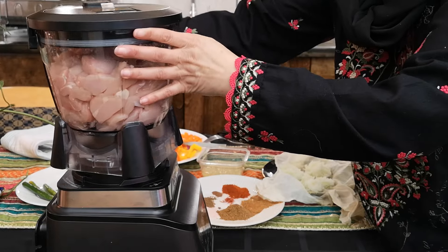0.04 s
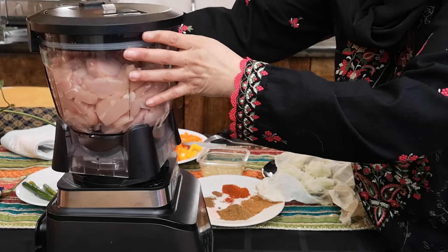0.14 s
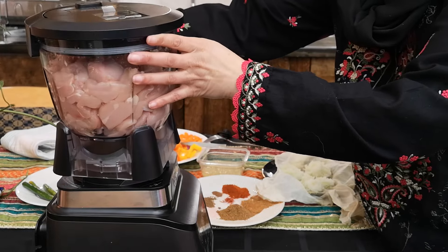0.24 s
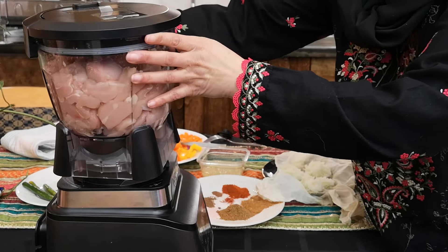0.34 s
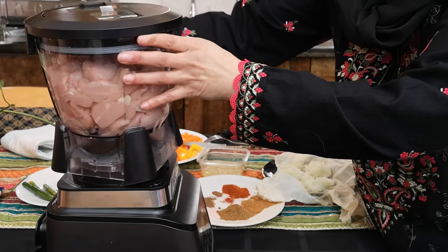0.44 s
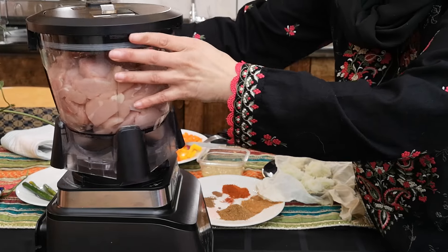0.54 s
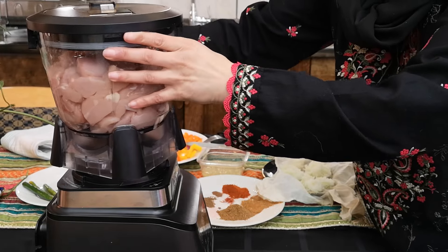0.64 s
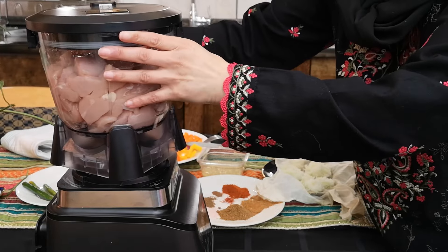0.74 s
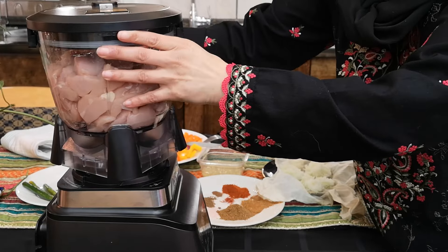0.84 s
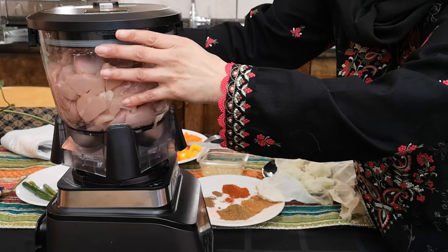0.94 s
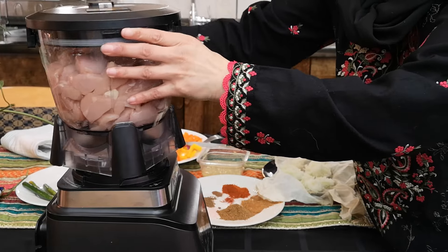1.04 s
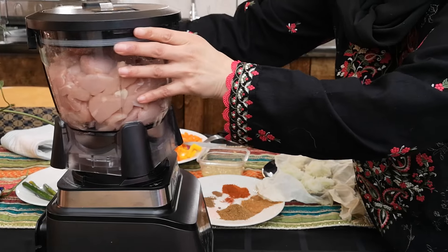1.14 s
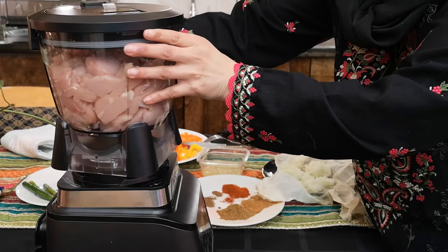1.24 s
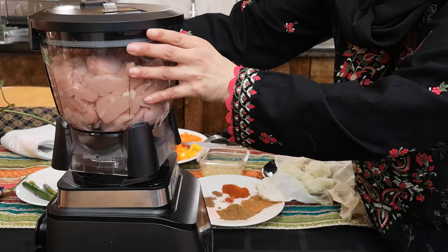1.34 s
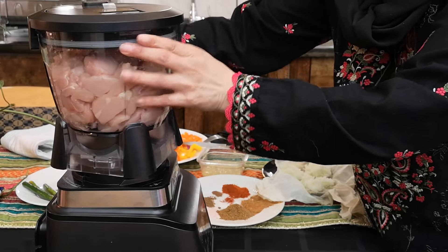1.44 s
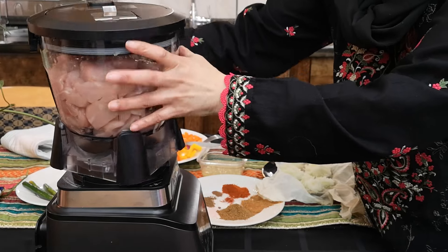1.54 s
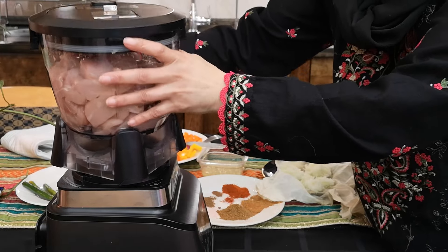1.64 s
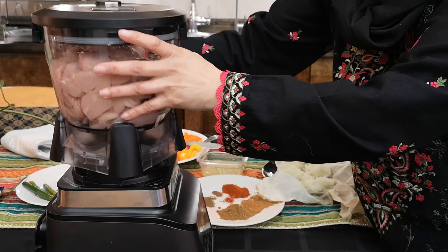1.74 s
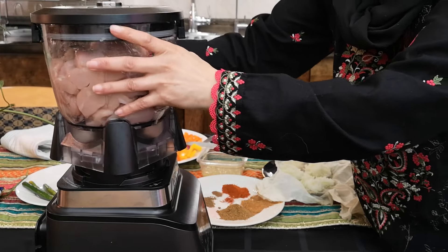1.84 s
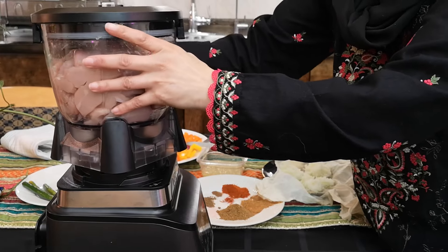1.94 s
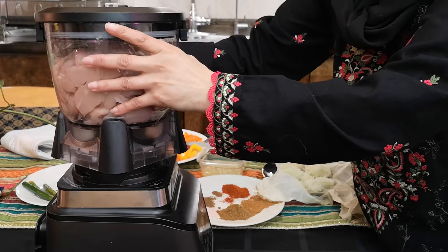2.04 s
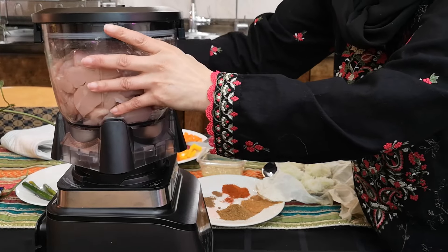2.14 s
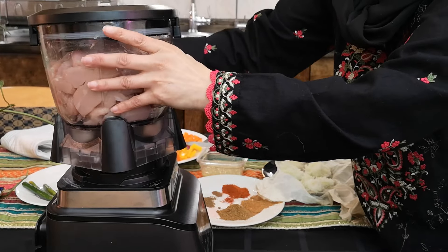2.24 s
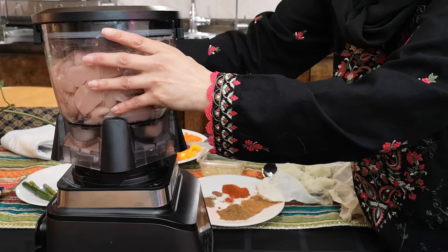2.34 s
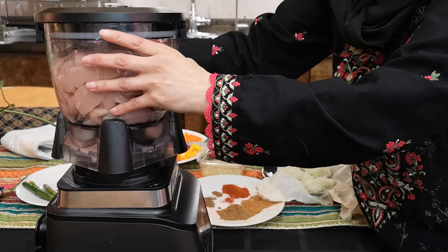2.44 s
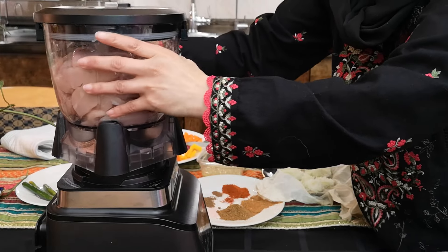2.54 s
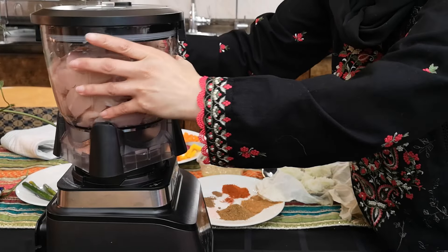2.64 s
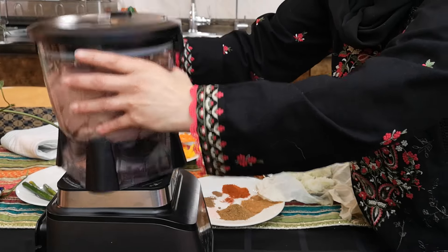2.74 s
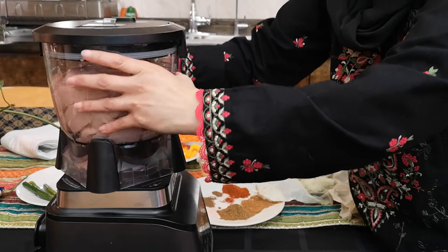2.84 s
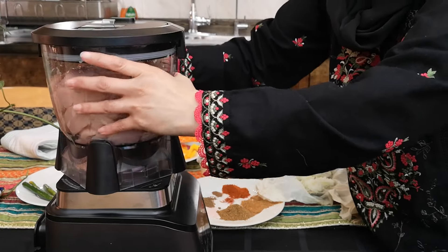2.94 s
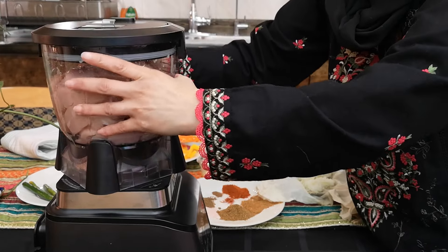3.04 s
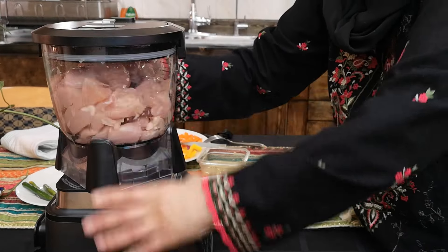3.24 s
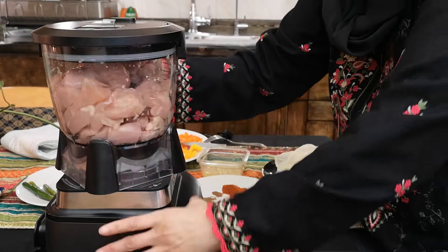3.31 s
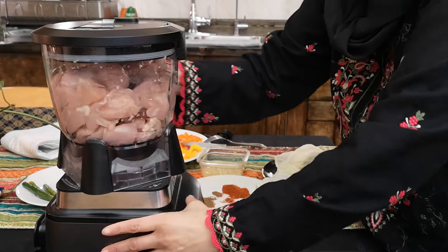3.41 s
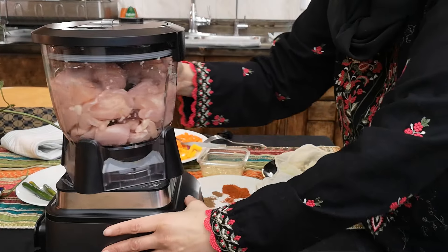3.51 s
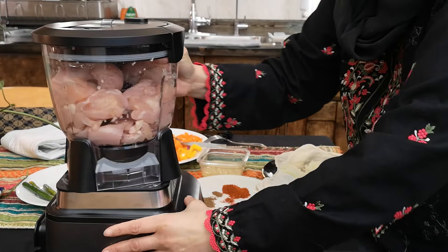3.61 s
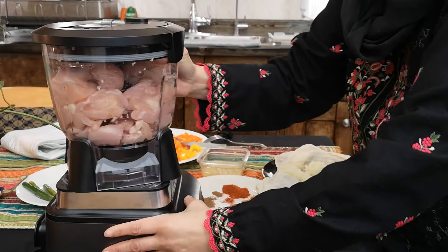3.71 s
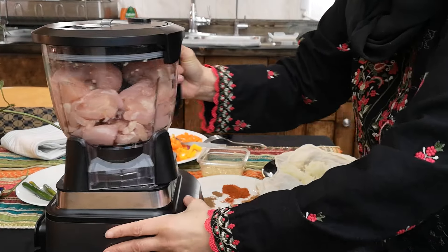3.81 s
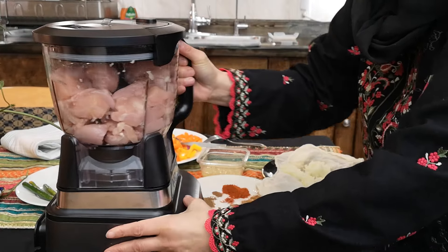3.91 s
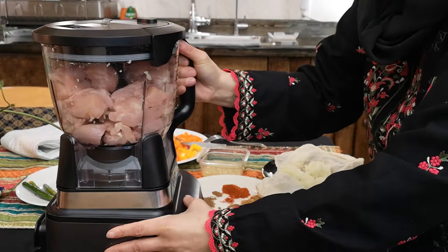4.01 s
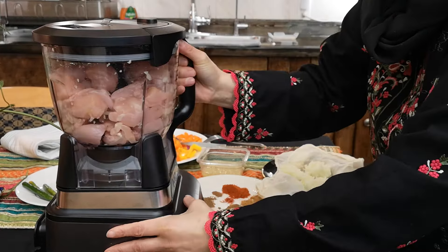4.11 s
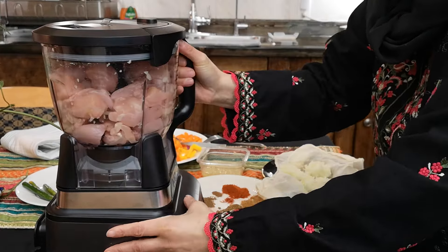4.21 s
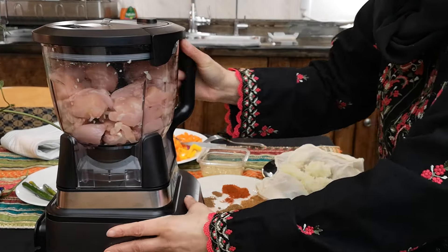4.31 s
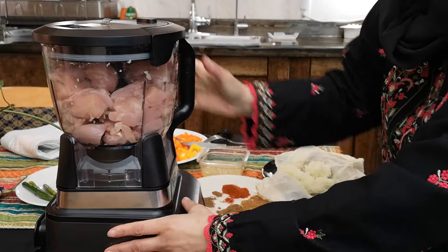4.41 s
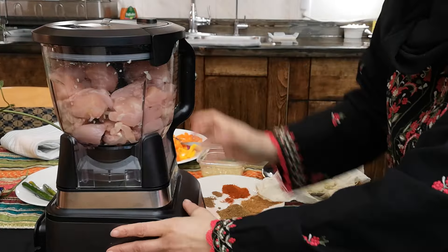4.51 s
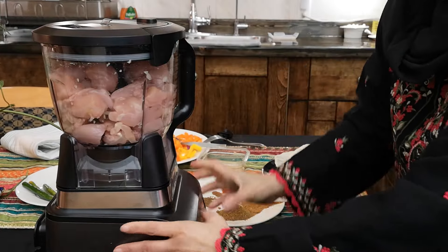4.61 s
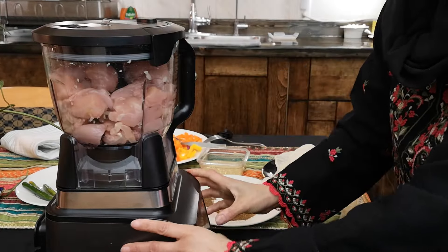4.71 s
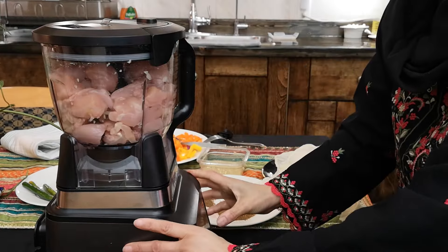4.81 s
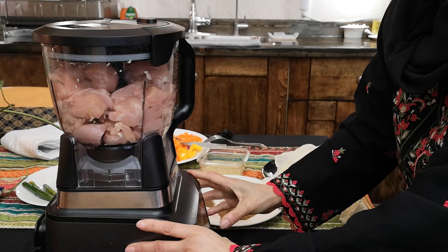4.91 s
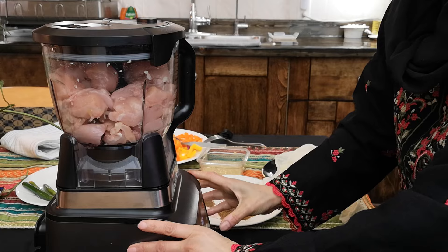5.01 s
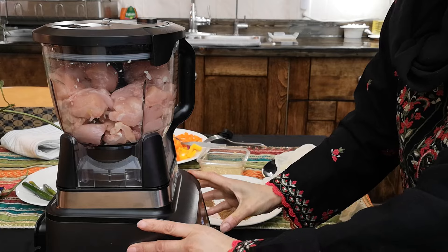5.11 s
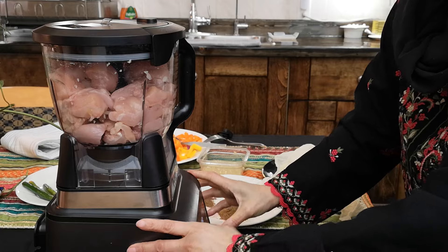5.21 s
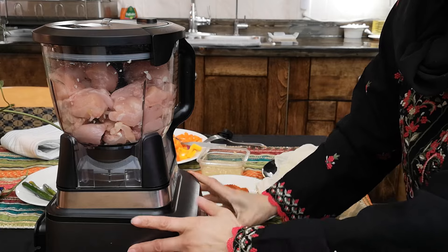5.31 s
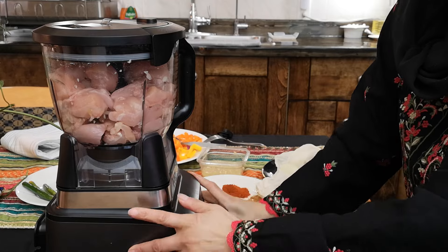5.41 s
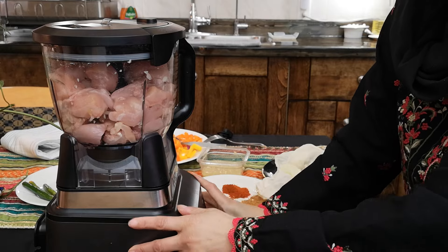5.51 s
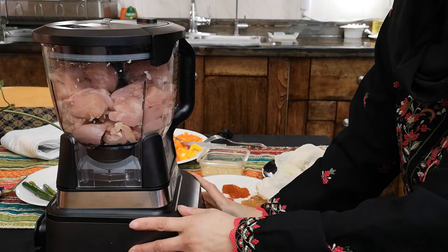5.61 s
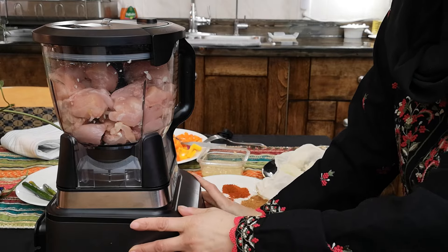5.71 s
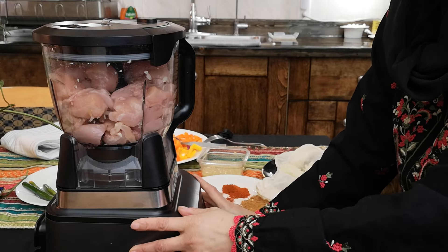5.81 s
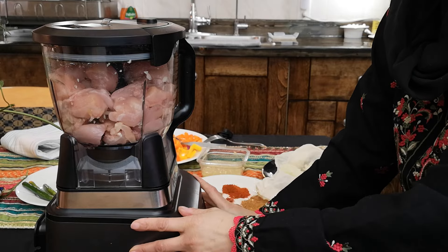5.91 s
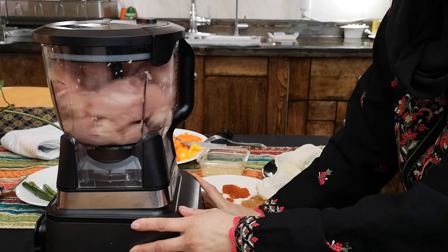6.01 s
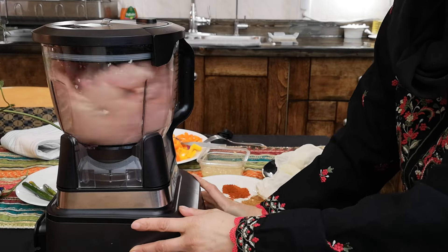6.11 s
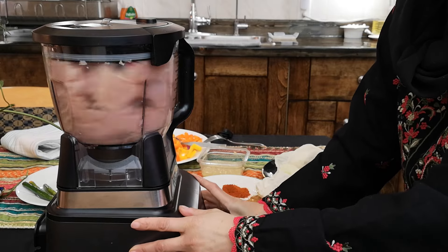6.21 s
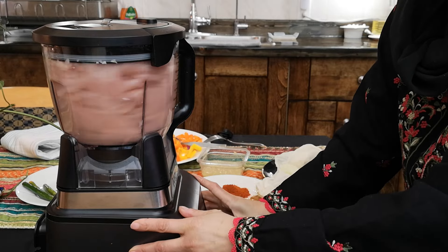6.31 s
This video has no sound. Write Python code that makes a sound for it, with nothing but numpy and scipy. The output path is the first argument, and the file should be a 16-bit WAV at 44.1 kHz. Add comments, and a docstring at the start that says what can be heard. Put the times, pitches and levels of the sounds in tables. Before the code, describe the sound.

A close stereo kitchen scene with short, hard reflections, low rumble, soft hiss and a wavering low hum that swells until about 1.4 s and again from 2.3 to 3.6 s. A plastic bowl is nudged on its base: faint dull rubs at 0.2, 0.5, 0.7 and 1.1 s, then shorter, slightly stronger scuffs from 1.6 to 1.9 s. At 2.8-3.1 s it seats with a rapid clatter, the loudest clunk at 2.9 s, hollow thump and deep rocking of the base. A tiny rub follows at 3.5 s. Around 4.0-4.1 s the lid latch snaps in several bright clicks; a faint tick comes at 4.4 s. Small button clicks sound near 5.0, 5.3 and 5.9 s. At 6.04 s the motor starts, quickly loud, with rising whine, gear rattle, fan rush and meat thudding against the bowl, still running at the end.

```python
"""Food processor on a kitchen table

The plastic bowl is nudged round, a stick-slip scuff over a hollow drone, then drops onto the base and rocks it.
The lid latch snaps shut and buttons click: short bursts of dense plastic modes, pings and a body thump.
The motor spins up with gear rattle, fan rush and whine, throwing food against the bowl.
A hard room answers every blow; a wavering low hum, a rumble and a soft hiss lie underneath."""
import sys
import numpy as np
from scipy import signal
from scipy.fft import rfft, irfft
from scipy.io import wavfile
from scipy.ndimage import uniform_filter1d

SR = 44100
rng = np.random.default_rng(int(sys.argv[2]) if len(sys.argv) > 2 else 0)


def waveform_to_disk(signal):
    """Save audio, clipped to [-1, 1], as 16-bit WAV at the path in sys.argv[1]."""
    frames = np.transpose(np.atleast_2d(signal))
    scaled = np.clip(frames, -1, 1) * 32767
    samples = np.round(scaled).astype(np.int16)
    wavfile.write(sys.argv[1], SR, samples)


N = 280035
TIME = np.arange(N) / SR

# Colour of the motor housing: (frequency [Hz], relative density [dB per Hz])
HOUSING_COLOUR = [(300, -27), (500, -13.5), (700, -2.5), (880, -7.5), (1400, -2.5), (1850, -2), (2300, 3.5),
                  (3100, -9), (5000, -16.5), (5800, -16), (6500, -19), (7800, -16), (11500, -38),
                  (15500, -68)]
# Uneven radiation of the housing: (frequency [Hz], left-right difference [dB])
HOUSING_LEAN = [(60, 0.0), (110, 0.0), (200, 0.0), (380, -9), (700, 4.5), (1290, -0.5), (2380, -2.0),
                (4400, 3.5), (8120, 3.5), (15000, -12)]
# Colour of food churning in the bowl: (frequency [Hz], relative density [dB per Hz])
CHURN_COLOUR = [(85, -15.5), (120, -3), (190, -6), (305, 0.5), (355, -2), (450, -25.5), (900, -63)]
# Gear and commutator whine: (multiple of shaft speed [ratio], level [dB])
WHINE_TONES = [(9, -8.5), (12, -6.5), (18, -32), (31, -39), (40, -29)]
# Blades biting into big pieces: (time [s], extra drive [dB], extra churning [dB])
FOOD_BITES = [(6.111, 7, 10), (6.188, 7, 7), (6.278, 3, 4.5)]
# Plastic contacts: (time [s], level [dB], ring t60 [s], body thump [dB], left-right difference [dB],
# rebound against the first blow [dB], part [name])
PART_CONTACTS = [ (2.812, -41.5, 0.056, -56, 6, 1.5, "rim"), (2.848, -24, 0.054, -37, 4, -3.5, "rim"),
                 (2.867, -20, 0.19, -22, 3.5, -10, "rim"), (2.891, -9, 0.015, -17.5, -1.5, -8, "seat"),
                 (2.891, -22.5, 0.019, -42, 6, -24, "latch"), (2.946, -18, 0.1, -24.5, -5.5, -9.5, "seat"),
                 (2.996, -24, 0.26, -40, -1.5, -14.5, "seat"), (3.061, -35, 0.058, -47, 1, 3, "catch"),
                 (3.968, -29, .15, -38, -6.5, 2, "lid"), (4.016, -21.5, 0.065, -29, 1.5, -7, "lug"),
                 (4.053, -18.5, 0.011, -31, 7.5, -8.5, "latch"),
                 (4.064, -21, 0.063, -32, -13.5, -8.5, "latch"),
                 (4.096, -21, 0.23, -32, -2.5, -5.5, "latch"), (4.429, -41, 0.2, -66, 5.5, -2, "tab"),
                 (5.027, -35.5, 0.026, -52, 6.5, 1.5, "switch"), (5.243, -57, .08, -57, 4, -10, "tab"),
                 (5.304, -38.5, 0.025, -74, 2, 0, "release"), (5.897, -35, 0.054, -36, 8.5, 2.5, "start"),
                 (6.044, -36, .2, -68, 3, -3, "relay")]
# Colour of each struck part, by name: (frequency [Hz], relative density [dB per Hz])
PART_COLOURS = { "rim": [(88, -45), (150, -16), (290, 0), (352, -18), (462, -16), (668, -11), (1130, -17.5),
                (1480, -17.5), (2310, -18.5), (3220, -32), (3690, -28), (4750, -34), (9360, -36),
                (13000, -50), (15500, -104)], "seat": [(60, -2), (120, -5), (200, 1.5), (310, -0.5),
                (480, -15.5), (720, -17.5), (1000, -15.5), (1350, -15), (1800, -15.5), (2350, -16),
                (3600, -25.5), (6500, -32.5), (10000, -36.5), (15500, -66)], "catch": [(200, 8.5),
                (1800, -10), (2400, 2), (2900, -13), (3500, -2), (3850, -5), (4280, 1), (5000, -15),
                (6700, -18), (7700, -3), (8900, -18.5), (11000, -15), (12300, -18), (13500, -32)],
                "lid": [(150, -11), (300, -3), (520, -8), (750, -6), (900, -3), (1020, -8), (1250, -12),
                (1500, 1.5), (1800, -15), (2400, -4.5), (4200, -22.5), (6400, -22), (7500, -13),
                (15000, -44)], "latch": [(150, -4), (310, 1.5), (560, -12.5), (1100, -1), (1900, -2),
                (2800, 4), (3900, -13.5), (4700, -0.5), (5400, 3.5), (6500, -6.5), (7400, -3.5),
                (10200, -5), (11500, -19.5), (15500, -24)], "lug": [(88, -34), (150, -2), (296, -2),
                (453, -15), (751, -9), (1130, -10), (1480, -12), (1760, -14.5), (2410, -4.5), (4220, -30),
                (5230, -21), (6110, -27), (7130, -29), (10100, -26), (15500, -64)], "tab": [(200, -5),
                (480, -15), (720, 0), (1200, -2), (2200, -0.5), (3500, -10.5), (5200, -6), (7300, -2.5),
                (9500, -17), (12000, -31), (15000, -34)], "switch": [(180, -35), (300, -5), (474, -26),
                (680, -37), (775, -20), (1110, -15), (1330, -26), (1880, -4.5), (2140, -16), (3330, -11),
                (3920, -11.5), (4250, -26), (6510, -25), (7300, -23.5), (15000, -52)],
                "release": [(290, -63), (500, -24), (811, -30), (1130, -22), (1470, -20), (1850, -3),
                (2680, -26), (3050, -34), (3940, -24.5), (5950, -39), (7580, -27), (8490, -42), (9930, -33),
                (11800, -38), (15000, -55)], "start": [(120, -73), (200, -37), (267, -23), (309, 6),
                (397, -10), (581, -24), (1110, -26), (1460, -19.5), (2060, -19.5), (3010, -20), (3940, -33),
                (5760, -25), (6530, -39), (7420, -26), (15000, -60)], "relay": [(400, -17), (2000, 3),
                (3500, -7), (5800, 1), (7000, 4), (8800, -11), (10500, 4), (12500, -18), (15500, -17)]}
# Pings of the springy parts, by name: (frequency [Hz], level against the contact [dB], t60 [s])
PART_PINGS = { "catch": [(2396, -11, .12), (3470, -20, .25), (4220, -14, .2), (7450, -7, .1),
              (7880, -6.5, 0.079)], "lid": [(2670, -8, 0.055)], "lug": [(764, -1, 0.079),
              (2590, -9, 0.047)], "switch": [(1875, -0.5, 0.045)], "release": [(1860, 1, 0.065)]}
# Modes of the hollow bowl and base: (nominal frequency [Hz], nominal level [dB], t60 [s])
BODY_MODES = [(121.9, -11.5, 0.51), (193.6, -4.5, 0.33), (273, -4.5, 0.095), (300.5, 4.5, 0.12),
              (341.8, -8.5, 0.33)]
# Strokes of the bowl's foot rubbing round on the base: (time [s], length [s], level [dB])
RUB_STROKES = [(.221, .2, -52), (0.531, 0.12, -55), (0.712, 0.05, -47), (1.069, 0.23, -53.5),
               (1.571, 0.057, -41.5), (1.646, 0.057, -43.5), (1.766, 0.041, -45.5), (1.852, 0.042, -45),
               (3.48, 0.061, -46.5)]
# Colour of the scuff: (frequency [Hz], relative density [dB per Hz])
SCUFF_COLOUR = [(150, -10), (300, 10), (450, -8.5), (660, -1), (950, -10), (1300, -4.5), (2500, -18.5),
                (7500, -32.5), (15000, -42)]
# Shoves that set the base rocking on its feet: (time [s], length [s], level [dB])
BASE_SHOVES = [(2.9063, 0.21, -17.5), (4.117, 0.044, -24.5)]
# Room decay: (frequency [Hz], t60 [s])
KITCHEN_DECAY = [(100, 0.56), (300, 0.19), (1000, 0.27), (2800, 0.25), (7000, 0.22), (14000, 0.14)]
# Swells of the low hum: (time [s], length [s], level added to the resting hum [dB])
LOW_HUM_SWELLS = [(-.1, 1.49, -49), (2.295, 1.36, -48.5)]
# Colour of the soft hiss: (frequency [Hz], relative density [dB per Hz])
AIR_COLOUR = [(240, -30.5), (400, -4.5), (452, -2), (503, -8), (663, -8.5), (860, -8), (1170, -3.5),
              (1260, -7), (1740, 0), (2510, -7), (3300, -15.5), (6480, -20.5), (7670, -20), (8530, -24),
              (15500, -30.5)]
# Colour of the rumble: (frequency [Hz], relative density [dB per Hz])
RUMBLE_COLOUR = [(12, -29), (20, 4.5), (33, 1.5), (54, -11), (97, -2), (136, -16), (165, -7.5),
                 (241, -19.5), (278, -14), (450, -33), (580, -51), (990, -120)]

# the motor closes in on its top speed; its noise grows steeply until the gears run at full load
MOTOR_ON_S, SPIN_UP_S, TOP_TURNS_PER_S = 6.04, 0.137, 195   # SPIN_UP_S is a time constant
LOADED_TURNS_PER_S, LOAD_POWER = 52.5, 4.6
DRIVE_DB, CHURN_DB = -19, -21.5
CHURN_FALL_DB_PER_S = -18   # the churning eases as the food is flung outward
BITE_S, SLAP_LAG_S = 0.013, 0.014   # half length of a bite; the piece hits the bowl a moment later

# every part rebounds once against its opposite edge
REBOUND_S, REBOUND_THUMP_DB = 0.0128, -3.5   # delay; thump change
REBOUND_RING, REBOUND_PAN = 1.1, -0.9   # ratios to the first blow
BODY_RISE_S = 0.0046

SCUFF_DB, SCUFF_DB_PER_S = -4, -28   # scuff against the bowl's drone: long slow strokes scuff less
ROCK_HZ, ROCK_ATTACK_S, ROCK_T60_S = 22.5, 0.04, 0.24
HUM_HZ, HUM_REST_DB, HUM_FADE_S = 86.7, -63, 0.17   # HUM_HZ is the centre of the waver
AIR_DB, RUMBLE_DB = -52, -45
CUTOFF_HZ = 15600


def motor(teeth=6, rattle_db=0.0, fan_db=-4.0, whine_db=0.0, uneven_db=4.0,
          jitter=0.025, treble_hz=3000, dull=0.97, chop_db=1.5):
    """Gear teeth rattle the housing, the fan rushes and brightens with speed, the blades chop and churn the food."""
    running = TIME > MOTOR_ON_S
    speed, drive, food = spin_up(TIME[running])
    length = len(speed)
    load = rms_one(butter(rng.standard_normal(length), 70, "low"))   # changes as blades meet food
    turns = np.cumsum(speed * (1 - jitter * load)) / SR

    # one knock for each passing tooth, each of its own strength and sign
    tooth_passes = np.diff(np.floor(turns * teeth), prepend=0)
    knocks = tooth_passes * from_db(uneven_db * np.clip(rng.standard_normal(length), -2, 2))
    shell = diffuse(SR // 50) * decay(TIME[:SR // 50], 0.012)
    signed_knocks = knocks * rng.choice([-1, 1], length)
    rattle = signal.fftconvolve(signed_knocks[None], shell, axes=1)[:, :length]
    fan = from_db(fan_db) * diffuse(length)
    gears = colour(from_db(rattle_db) * rms_one(rattle) + fan, HOUSING_COLOUR)

    soft = np.clip(dull * (1 - speed / speed.max()), 0, 1)   # slow teeth strike softly
    gears = rms_one(gears - soft * butter(gears, treble_hz, "high", order=1))
    lean_db = at_hz(HOUSING_LEAN, np.fft.rfftfreq(length, 1 / SR))
    gears = irfft(rfft(gears) * from_db(lean_db * [[0.5], [-0.5]]), length)

    chop = from_db(chop_db * np.sin(2 * np.pi * turns / 4))   # the blades are geared down
    churn = rms_one(colour(diffuse(length) * chop, CHURN_COLOUR))
    tones = from_db(whine_db) * whine(turns) * speed / speed.mean()
    out = np.zeros((2, N))
    out[:, running] = drive * (gears * chop + tones) + food * churn
    return out


def spin_up(s):
    """Shaft speed nears its top exponentially; drive and churning levels follow it, with a boost at each bite."""
    t = s - MOTOR_ON_S
    speed = TOP_TURNS_PER_S * (1 - np.exp(-t / SPIN_UP_S))
    loaded = np.minimum(speed / LOADED_TURNS_PER_S, 1) ** LOAD_POWER
    bite_db = sum(db * np.exp(-((s - at) / BITE_S) ** 2) for at, db, _ in FOOD_BITES)
    slap_db = sum(db * np.exp(-((s - at - SLAP_LAG_S) / BITE_S) ** 2) for at, _, db in FOOD_BITES)
    drive = loaded * from_db(DRIVE_DB + bite_db)
    food = loaded * from_db(CHURN_DB + CHURN_FALL_DB_PER_S * t + slap_db)
    return speed, drive, food


def whine(turns, width_hz=70):
    """Gear mesh and commutator tones climb with the shaft; the shaking load blurs them into narrow bands."""
    out = 0
    for multiple, db in WHINE_TONES:
        blur = butter(rng.standard_normal((2, 2, len(turns))), width_hz, "low")
        phase = 2 * np.pi * multiple * turns
        band = blur[0] * np.cos(phase) + blur[1] * np.sin(phase)
        out = out + from_db(db) * rms_one(band)
    return out


def contacts():
    """Each part strikes, then rebounds off its opposite edge, so the image flips side."""
    out = np.zeros((2, N))
    for s, db, t60, body_db, pan_db, rebound_db, part in PART_CONTACTS:
        add(out, s, strike(part, db, t60, body_db, pan_db))
        rebound = strike(part, db + rebound_db, t60 * REBOUND_RING,
                         body_db + REBOUND_THUMP_DB, pan_db * REBOUND_PAN)
        add(out, s + REBOUND_S, rebound)
    return out


def strike(part, db, t60, body_db, pan_db, span_s=0.0083, snap_db=-5.5, hard_s=0.027):
    """A contact sets off the dense, quickly dying modes of a plastic part, and the hollow body under it."""
    t = TIME[:SR // 3]
    shell = diffuse(len(t)) * decay(t, t60)
    # the touch itself, before the shell rings; only short-ringing contacts get it
    snap = from_db(snap_db) * np.linalg.norm(shell[0]) * (t == 0)
    crack = colour(shell + snap * (t60 < hard_s), PART_COLOURS[part])
    crack = rms_one(crack) * np.sqrt(span_s / t[-1])   # level counts over the first instants
    pings = sum(from_db(ping_db) * mode(t, hz, ring) for hz, ping_db, ring in PART_PINGS.get(part, []))
    crack = crack + pings

    thump = 0
    for hz, mode_db, ring in BODY_MODES:   # every blow excites the body a little differently
        gain = from_db(mode_db + rng.normal(0, 1.0))
        thump = thump + gain * mode(t, hz * (1 + 0.0177 * rng.normal()), ring)
    thump = thump * (1 - np.exp(-t / BODY_RISE_S))   # the heavy body takes a moment to get moving
    pan = from_db([[pan_db / 2], [-pan_db / 2]])
    return from_db(db) * crack * pan + from_db(body_db) * thump


def rubs(slips_per_s=900):
    """Plastic slips on plastic in tiny jerks that swell and fade, and make the hollow bowl drone."""
    out = np.zeros((2, N))
    t = TIME[:SR // 3]
    body = sum(from_db(db) * mode(t, hz, t60) for hz, db, t60 in BODY_MODES)
    for s, length_s, db in RUB_STROKES:
        stroke = np.sin(np.pi * np.minimum(t / length_s, 1))
        slips = stroke * rng.standard_normal(len(t)) * (rng.random(len(t)) < slips_per_s / SR)
        grains = signal.fftconvolve(slips[None], diffuse(SR // 300), axes=1)[:, :len(t)]
        scuff = rms_one(colour(grains, SCUFF_COLOUR))
        drone = rms_one(signal.fftconvolve(slips, body)[:len(t)])
        scuff_gain = from_db(SCUFF_DB + SCUFF_DB_PER_S * length_s)
        level = np.sqrt(length_s / t[-1]) * from_db(db)   # level counts over the stroke
        add(out, s, level * (scuff_gain * scuff + drone))
    return out


def rocking():
    """The heavy base sways on its rubber feet while it is shoved, pumps the table, and settles."""
    out = 0
    for s, length_s, db in BASE_SHOVES:
        t = np.maximum(TIME - s, 0)
        attack = np.minimum(t / ROCK_ATTACK_S, 1)
        sway = attack * from_db(db) * decay(np.maximum(t - length_s, 0), ROCK_T60_S)
        out = out + sway * np.sqrt(2) * np.sin(2 * np.pi * ROCK_HZ * t)
    return out


def kitchen(x, wet_db=3.5, bass_wet_db=-2.0, gap_s=0.00918, table_db=-7.5,
            even_hz=45, early_db=3.5, early_s=0.015):
    """The table scatters sound at once; after a gap the walls answer with a tail that dies band by band."""
    t, edges = TIME[:SR], np.geomspace(90, 18000, 9)
    spectrum, hz, tail = rfft(diffuse(len(t))), np.fft.rfftfreq(len(t), 1 / SR), 0
    table_then_walls = np.where(t < gap_s, from_db(table_db), 1)
    for low, high in zip(edges, edges[1:]):
        band = irfft(spectrum * ((hz >= low) & (hz < high)), len(t))
        t60 = at_hz(KITCHEN_DECAY, np.sqrt(low * high))
        tail = tail + band * decay(t, t60) * table_then_walls
    tail = tail * from_db(early_db * np.exp(-(t / early_s) ** 2))   # nearby cupboards answer loudest

    # crowded room modes return about the same energy at every pitch
    power = uniform_filter1d(np.mean(abs(rfft(tail)) ** 2, axis=0), int(even_hz / hz[1]))
    wet_points = [(60, -14), (140, bass_wet_db), (350, bass_wet_db), (900, wet_db)]
    wet = from_db(at_hz(wet_points, hz)) * (hz < edges[-1])
    tail = irfft(rfft(tail) * wet / np.sqrt(abs(power) + 1e-6), len(t))[:, :SR // 2]
    return signal.fftconvolve(x, tail, axes=1)[:, :N]


def background(air_db=4.5, rumble_db=0.0, waver=0.076):
    """Hiss and rumble are coloured noise; the low hum is a sine whose pitch wavers and whose level swells."""
    level = from_db(HUM_REST_DB)
    for s, length_s, db in LOW_HUM_SWELLS:
        level = level + from_db(db) * swell(s, length_s, HUM_FADE_S)
    drift = rms_one(butter(rng.standard_normal(N), 11.4, "low"))
    turns = np.cumsum(HUM_HZ * (1 + waver * drift)) / SR
    hum = level * np.sqrt(2) * np.sin(2 * np.pi * turns)
    air = from_db(AIR_DB) * rms_one(colour(diffuse(N), AIR_COLOUR))
    rumble = from_db(RUMBLE_DB) * rms_one(colour(diffuse(N), RUMBLE_COLOUR))
    return hum + air + rumble


def swell(s, length_s, fade_s):
    """Fade in, hold, fade out."""
    return np.clip(np.minimum(TIME - s, s + length_s - TIME) / fade_s, 0, 1)


def from_db(db):
    """Gain of a level in dB."""
    return 10 ** (np.asarray(db) / 20)


def decay(t, t60):
    """Exponential fade that falls 60 dB in t60 seconds."""
    return from_db(-60 * t / t60)


def mode(t, hz, t60):
    """A struck resonance: a sine that dies away."""
    return np.sin(2 * np.pi * hz * t) * decay(t, t60)


def rms_one(x):
    """Scale to unit rms."""
    return x / np.sqrt(np.mean(x ** 2) + 1e-20)


def at_hz(points, hz):
    """Read a curve of (frequency, value) points on a log-frequency axis."""
    f, value = np.transpose(points)
    return np.interp(np.log(np.maximum(hz, 1)), np.log(f), value)


def butter(x, hz, kind, order=2):
    """Causal Butterworth filter."""
    return signal.sosfilt(signal.butter(order, hz, kind, fs=SR, output="sos"), x)


def colour(x, spectrum, size=8192):
    """Causal (minimum-phase) filter with the given spectrum, falling away below its first point."""
    hz = np.maximum(np.arange(size // 2 + 1) * SR / size, 1)
    gain = from_db(at_hz(spectrum, hz)) * np.minimum(hz / spectrum[0][0], 1) ** 2
    # folding the cepstrum onto positive times gives minimum phase
    cepstrum = irfft(np.log(gain))
    cepstrum[1:size // 2] *= 2
    cepstrum[size // 2 + 1:] = 0
    impulse = irfft(np.exp(rfft(cepstrum)))
    return signal.fftconvolve(x, impulse[None], axes=1)[:, :x.shape[1]]


def diffuse(length, apart_hz=490):
    """Stereo noise from all round: alike in both channels in the bass, largely unrelated above."""
    mid, side = rng.standard_normal((2, length))
    return (mid + butter(side, apart_hz, "high", order=3) * [[1], [-1]]) / np.sqrt(2)


def add(out, s, sound):
    """Mix a sound in at a time in seconds."""
    i = round(s * SR)
    out[:, i:i + sound.shape[-1]] += sound[..., :N - i]


def scene():
    """The machine in its room, over the rocking base and the background."""
    machine = rubs() + contacts() + motor()
    return machine + kitchen(machine) + rocking() + background()


def record(dry, top=0.81):
    """Peaks are rounded by soft saturation and the extreme treble is cut steeply."""
    rounded = top * np.tanh(dry / top)
    return signal.sosfilt(signal.ellip(10, 0.2, 80, CUTOFF_HZ, fs=SR, output="sos"), rounded)


dry = scene()
out = record(dry)
waveform_to_disk(out)
```